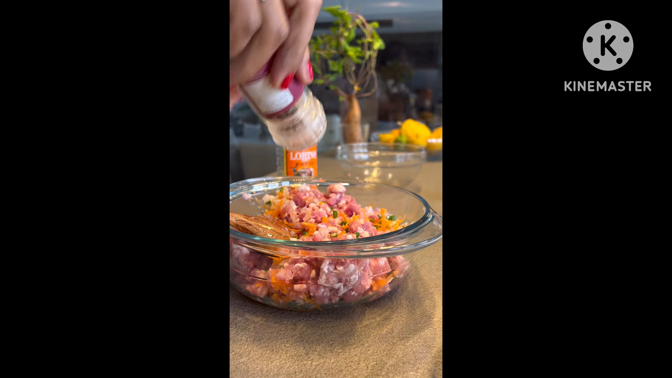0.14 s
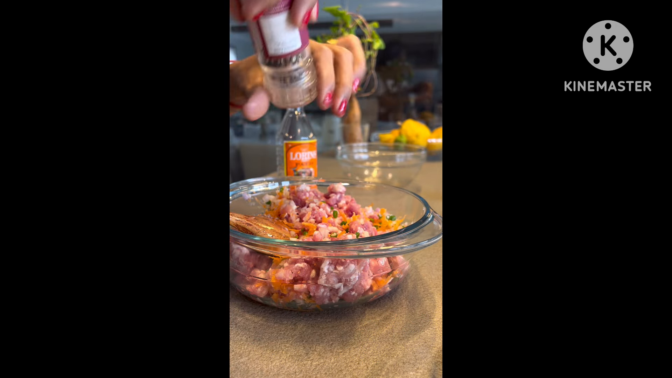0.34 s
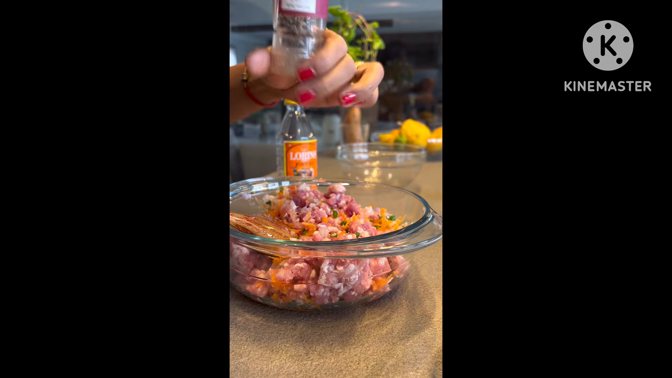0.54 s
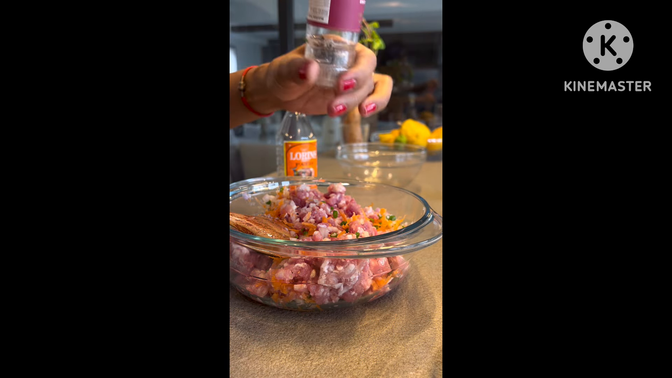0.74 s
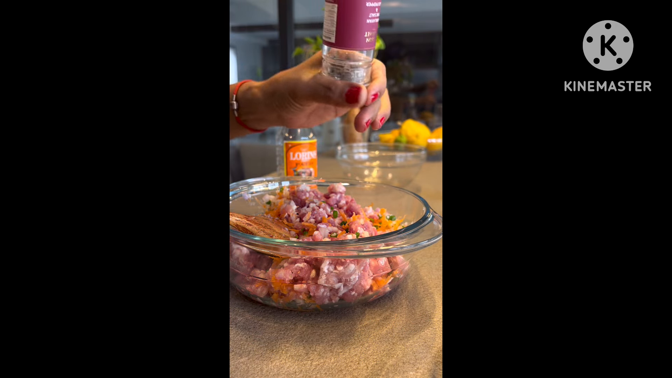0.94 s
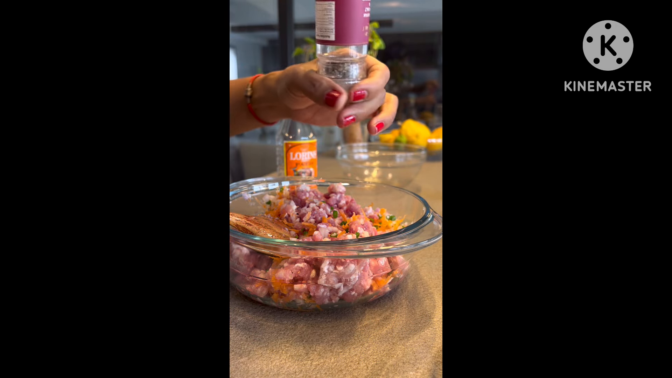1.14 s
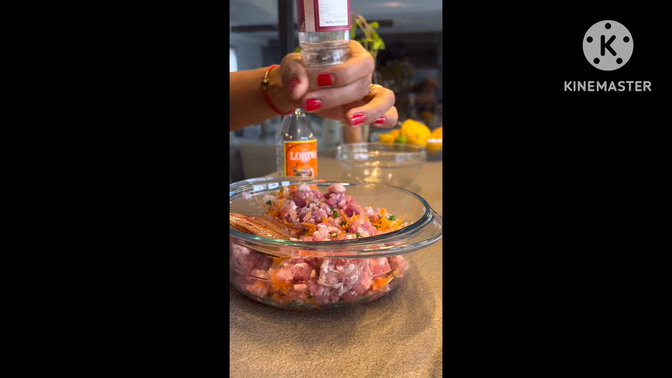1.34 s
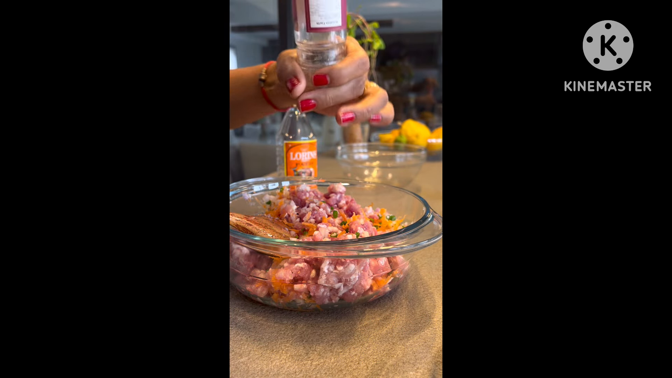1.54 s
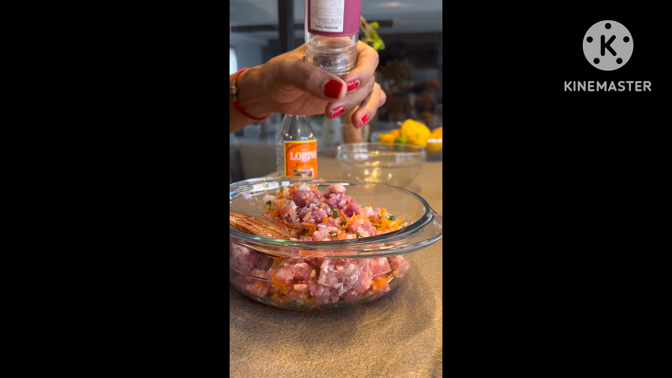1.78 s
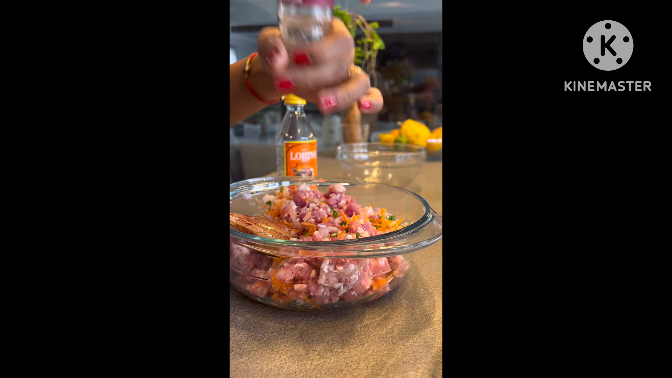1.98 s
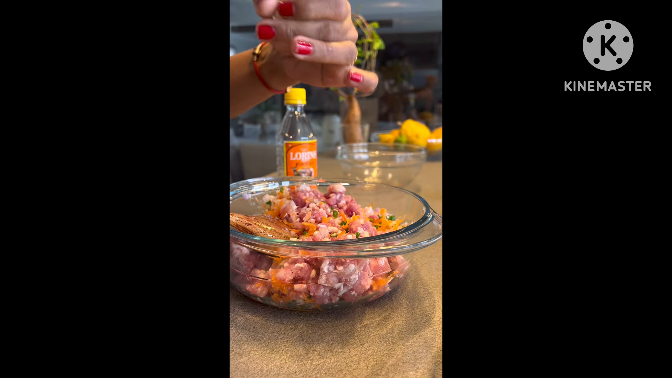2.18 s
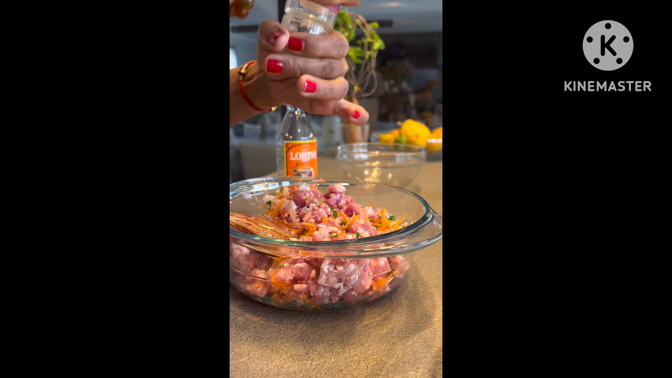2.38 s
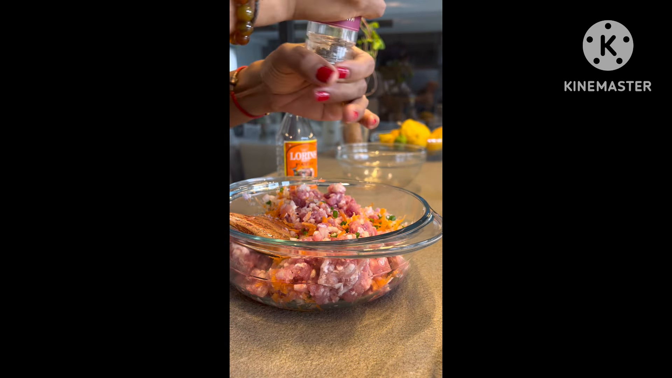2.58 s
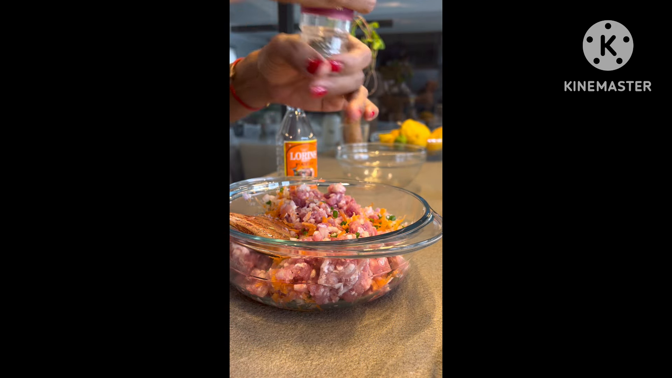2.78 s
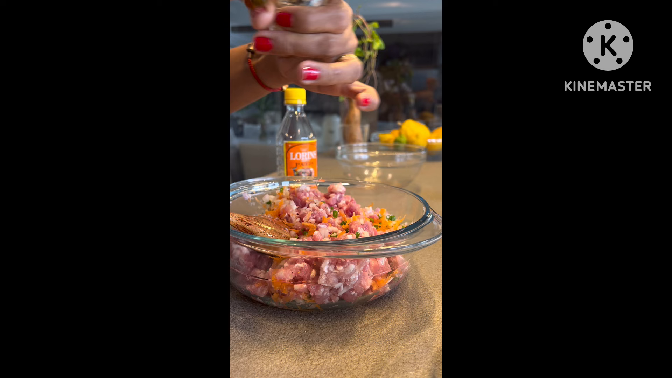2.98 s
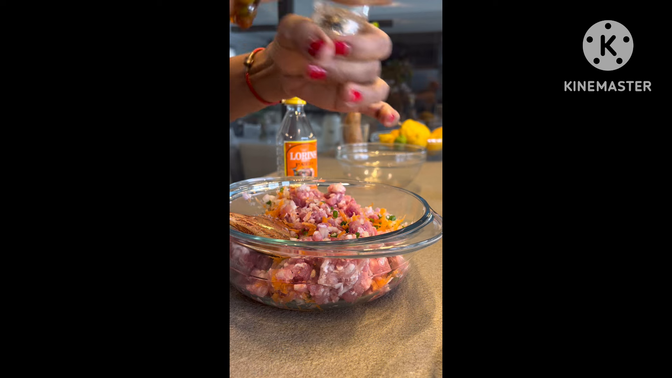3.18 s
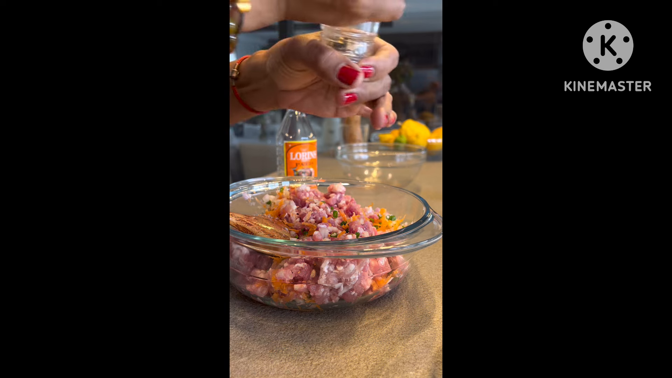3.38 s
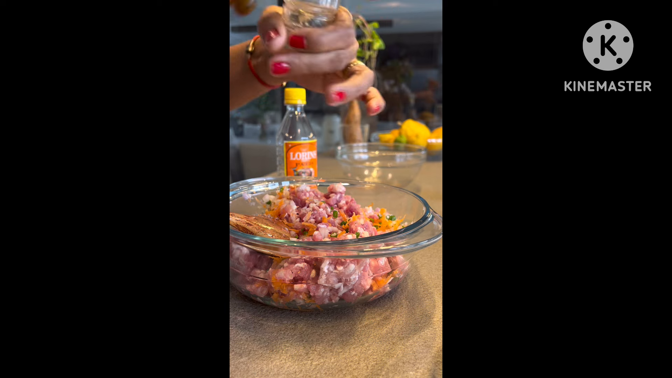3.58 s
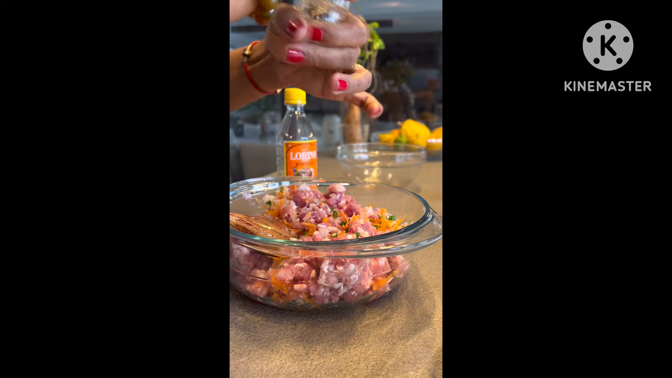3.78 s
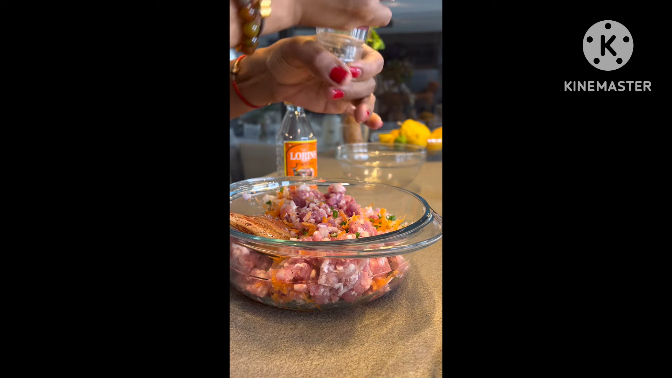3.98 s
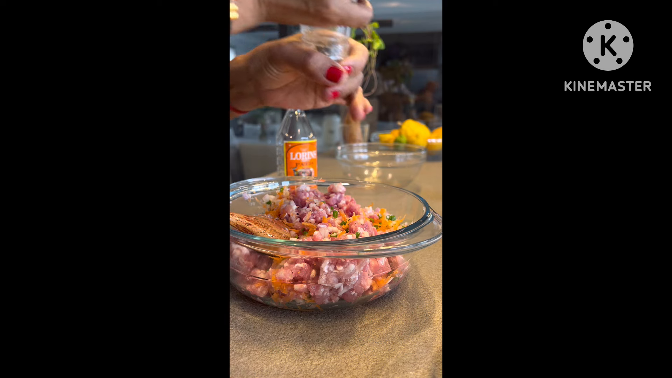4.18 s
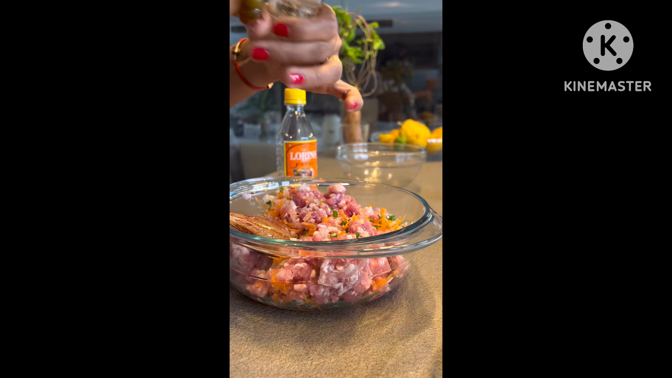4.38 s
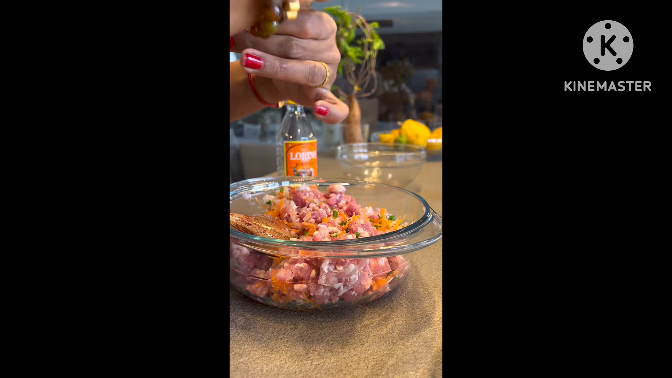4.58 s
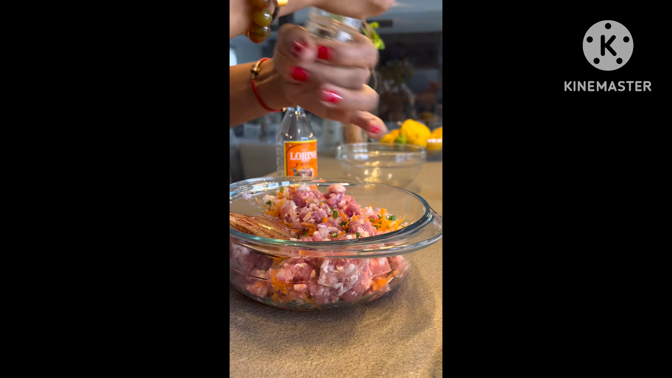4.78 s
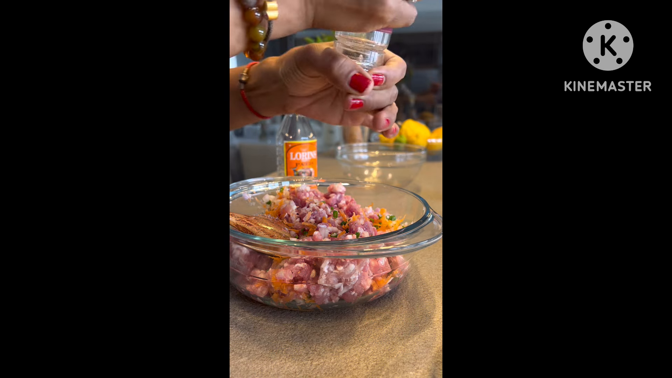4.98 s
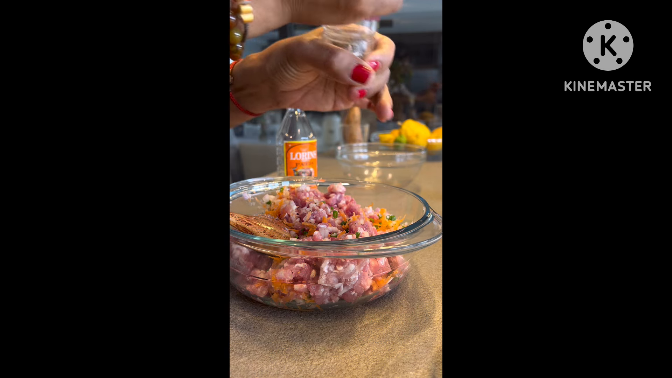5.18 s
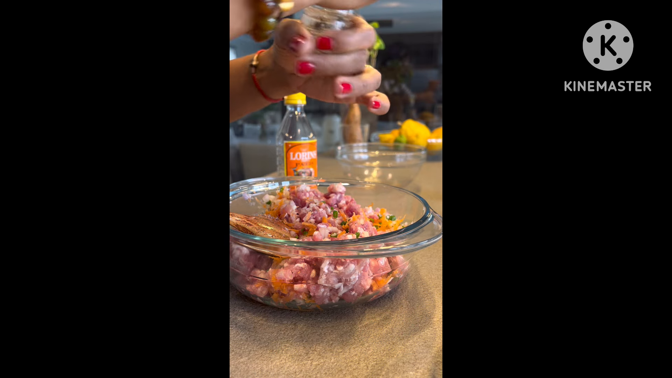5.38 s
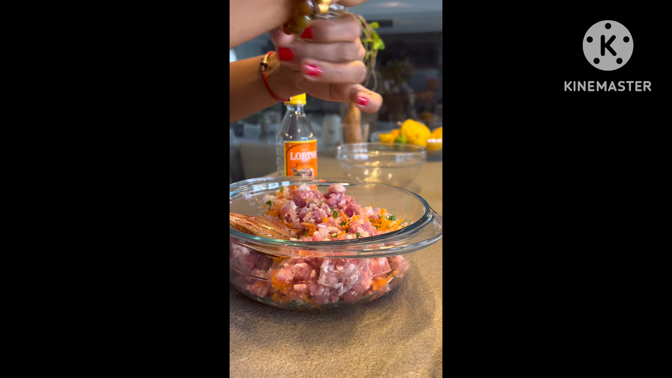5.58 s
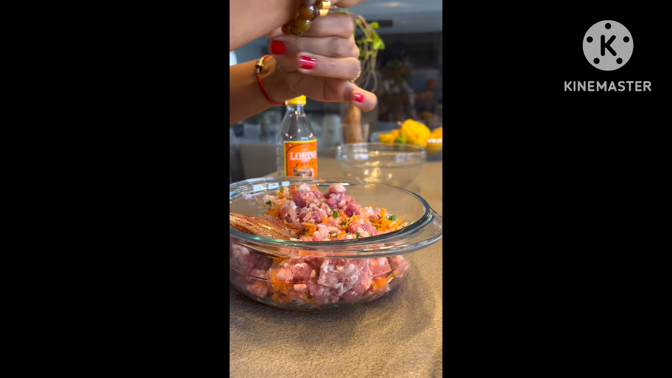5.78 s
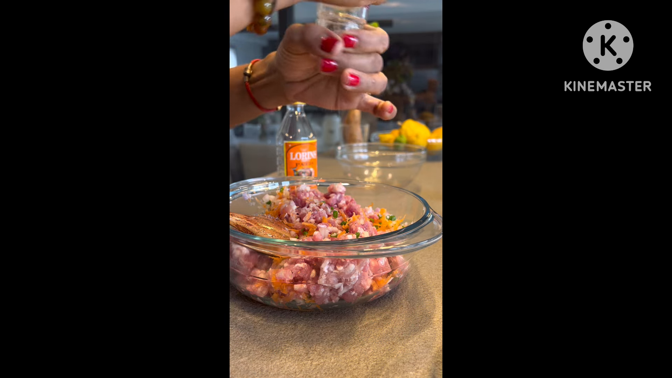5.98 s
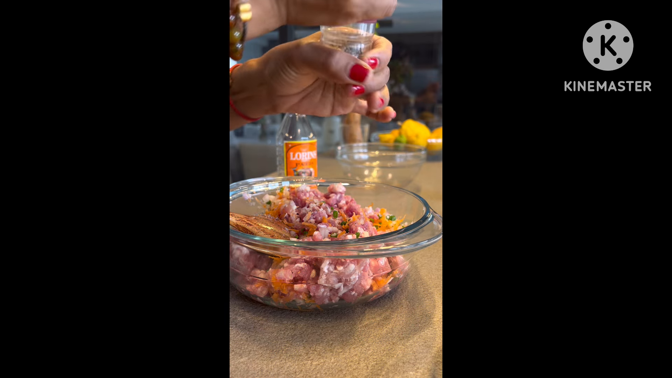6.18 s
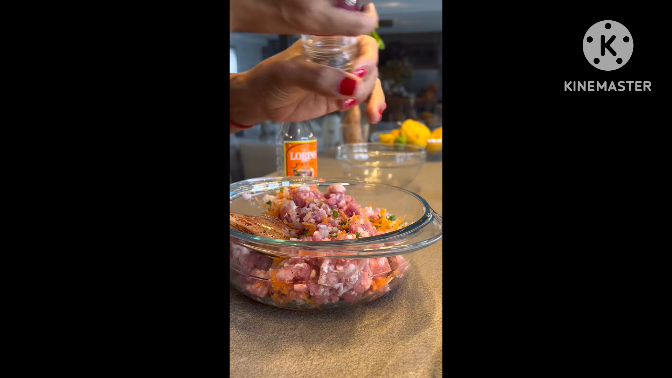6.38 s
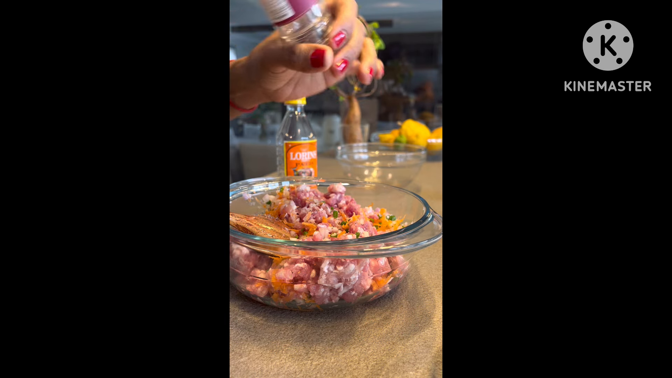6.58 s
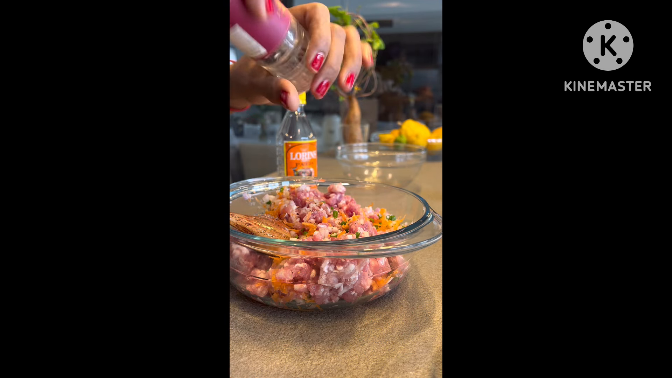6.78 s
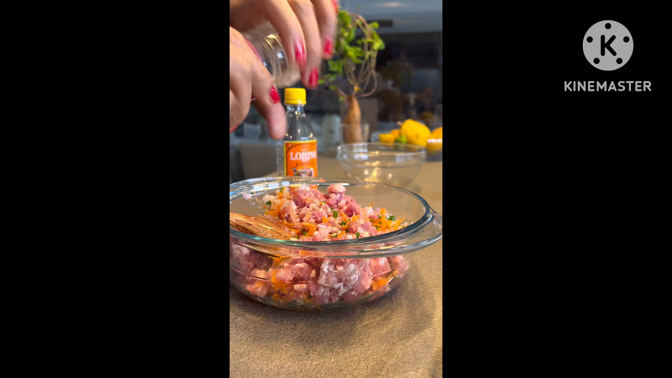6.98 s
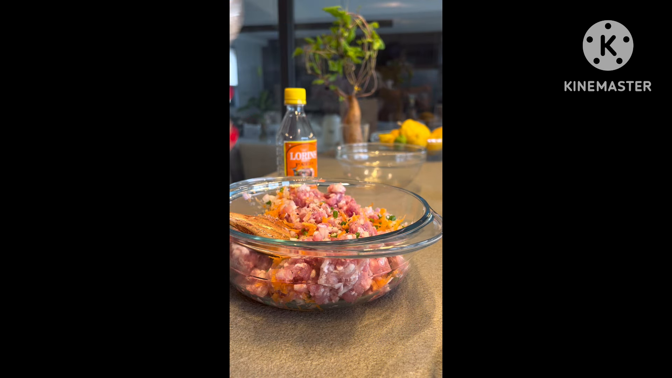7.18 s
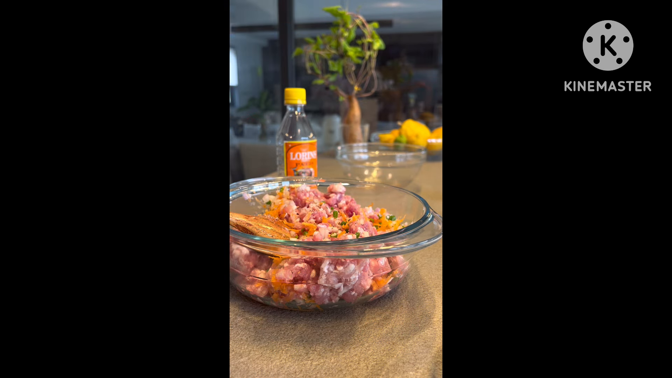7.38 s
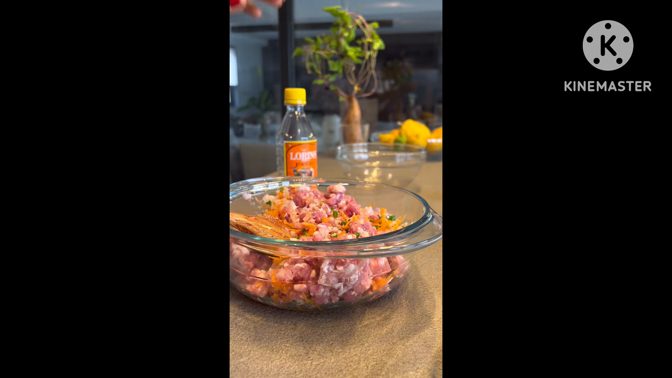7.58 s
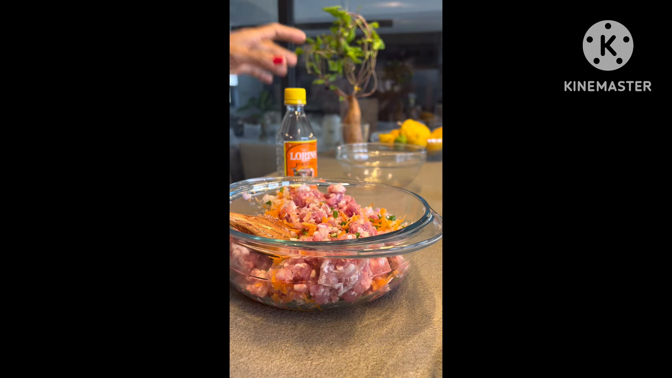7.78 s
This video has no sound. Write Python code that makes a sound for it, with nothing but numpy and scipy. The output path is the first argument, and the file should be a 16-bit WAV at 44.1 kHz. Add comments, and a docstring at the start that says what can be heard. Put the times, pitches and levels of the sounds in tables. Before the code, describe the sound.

Close, in a hard, echoing kitchen, loose crystals clink brightly in a glass jar with a burst of grit. A hand-twisted grinder then cracks coarse salt in uneven strokes with short gaps, growing denser midway. After the last crunches it goes nearly quiet, grains slide softly along the glass, and the jar lands with a padded knock. A faint low compressor hum and room air lie beneath.

```python
"""In a hard kitchen, a hand-twisted salt mill works over a bowl, heard from close by. Crystals clink in the glass
jar as it tips, then crack between the burrs (the grinding teeth); each crack is a noise burst plus short rings.
Grit crackles as many tiny bursts, grains slide along the glass, nails tick on the jar, and it is set down with
a knock. Dense noise echoes make the room ring; wavering low tones are a compressor's hum, soft noise is the air."""
import sys
import numpy as np
from scipy import signal
from scipy.fft import rfft, irfft, next_fast_len
from scipy.io import wavfile

SR = 44100
rng = np.random.default_rng(int(sys.argv[2]) if len(sys.argv) > 2 else 0)


def unload_audio(sound):
    """Save the sound as a 16-bit wav file, at the path given as the first command line argument."""
    columns = np.transpose(np.atleast_2d(sound))
    # keep every value between -1 and 1, then stretch to whole-number steps
    steps = np.round(np.clip(columns, -1, 1) * 32767)
    wavfile.write(sys.argv[1], SR, steps.astype(np.int16))


N = 345744  # length in samples
SIZE = next_fast_len(N + SR)  # filter length in samples, with room for a one-second echo tail
HZ = np.arange(SIZE // 2 + 1) * SR / SIZE  # the frequencies of the filters
TOP_HZ = 16900  # nothing much is heard above this

# Levels in the tables are relative, unless a comment says otherwise.
# background hum of the compressor: f/Hz, level/dB (rms of the steady part, before the waver)
HUM_TONES = [(49.3, -67.5), (98.6, -68), (147.9, -72)]
# air of the room: f/Hz, level/dB per Hz
AIR_SPECTRUM = [(33, -120), (50, -87), (150, -89), (450, -102), (1000, -95), (2500, -102), (6000, -110),
                (16000, -118)]
# sounds from all around: f/Hz, likeness of left and right/0-1
LEFT_RIGHT_LIKENESS = [(100, 0.98), (700, 0.59), (4000, 0.3), (6000, 0.91), (16000, 1)]
# fine grit crushed or shaken in each stroke: full from t/s, held t/s, level/dB
GRIT_STROKES = [(0, 0.046, -20.5), (0.421, 0.11, -40), (1.2, 0.084, -24.5), (4.252, 0.045, -38.5),
                (5.251, 0.023, -26), (5.4, 0.29, -36.5), (5.818, 0.4, -29), (6.708, 0.0095, -34.5)]
# how fast the grit swells and dies, and its level with the mill at rest
BUILD_DB_PER_S, EASE_DB_PER_S, STILL_DB = 218.5, 314, -74.5
# tone of the snaps and the grit: f/Hz, level/dB
SNAP_COLOUR = [(2500, -33), (4200, -6.5), (7500, -0.5), (9000, -2), (12000, -7), (15500, -8), (16800, -44)]
# rings heard with each crunch of the burrs, the lowest a woody knock that grows with them: f/Hz, level/dB, time
# to fall 60 dB t/s
BURR_MODES = [(950, -7, .01), (1750, 2, .007), (2300, 2, .007), (2800, -1, .005), (3500, -1, .012),
              (4950, -7, .005)]
# echoes in octave bands: centre f/Hz, level/dB, time to fall 60 dB t/s
ROOM_BANDS = [(254.4, 0, 0.46), (478.8, -4.5, 0.38), (964.6, -6.5, 0.5), (2035, -5, 0.36),
              (4270, -6.5, 0.46), (8330, -10.5, 0.5), (15800, -11, 0.45)]
# crystals hitting the glass: t/s, level/dB
CLINK_EVENTS = [(0.011, -9), (0.018, -14), (0.0423, -10.5), (0.064, -20.5)]
# rings of the glass: f/Hz, level/dB, time to fall 60 dB t/s
GLASS_MODES = [(3100, 19, 0.0039), (3550, 11.5, 0.0024), (6620, 11.5, 0.016), (8870, -8, 0.0049),
               (4960, 6, 0.03)]
# crystals that break or shift, and last a small tick after the jar is set down:
# t/s, snap level/dB, burr ring minus snap level/dB
CRACK_EVENTS = [(0.094, -20.5, -10), (0.1746, -20, -13.5), (0.2094, -27.5, -12.5), (0.4187, -36.5, -2.5),
                (0.466, -35.5, -33.5), (0.5706, -34, -2), (0.6746, -10, -11), (0.727, -25.5, -5),
                (0.7953, -27.5, -6.5), (0.8354, -10, 1), (0.9051, -1.5, -9), (0.959, -16.5, -9.5),
                (1.0647, -26.5, -6.5), (1.158, -25.5, -6.5), (1.192, -25, 0.5), (1.2217, -16.5, -6.5),
                (1.5168, -22.5, -6), (1.6476, -5, -5), (1.6665, -7.5, -6), (1.7371, -6, -12.5),
                (2.0733, -35.5, -9), (2.1342, -20, -17), (2.2447, -24, -8), (2.279, -27.5, -6),
                (2.326, -22, -3.5), (2.39, -28.5, -15.5), (2.4195, -5.5, -4.5), (2.537, -16, -2),
                (2.549, -23, -10), (2.571, -4, -10), (2.584, -22, -5), (2.6005, -9.5, -8), (2.614, -23, 7),
                (2.8575, -34.5, -12.5), (2.9861, -28.5, -13.5), (3.0665, -11, -10.5), (3.1336, -18, 1),
                (3.1495, -10.5, -14), (3.1723, -12.5, -13), (3.226, -29.5, 8.5), (3.2342, -15, -14),
                (3.238, -7.5, -10.5), (3.2478, -21.5, -8.5), (3.258, -18.5, 3.5), (3.2902, -15, -14),
                (3.3147, -21, -5.5), (3.543, -31, -11.5), (3.6664, -17.5, -13.5), (3.7821, -7.5, -8),
                (3.797, -22, 10), (3.8041, -7.5, -20.5), (3.8809, -4, -8), (3.9444, -12, -10.5),
                (3.9536, -12, 2), (3.973, -12, -5), (4.009, -13, -3), (4.0333, -15, -3),
                (4.0373, -10.5, -0.5), (4.201, -35, 0.5), (4.4094, -21, -8.5), (4.523, -24.5, -8),
                (4.6745, -16, -8.5), (4.7088, -17.5, -3.5), (4.722, -21, -5), (4.7442, -5.5, -9.5),
                (4.7682, -11, -2.5), (4.814, -20, -18), (4.833, -11.5, -2), (4.8443, -8.5, -16),
                (4.8683, -27.5, 3.5), (4.927, -22, 6.5), (4.9659, -17, -9.5), (4.9996, -10.5, -8),
                (5.005, -16.5, -5), (5.038, -15, -12), (5.1836, -38.5, 2), (5.21, -25, -5),
                (5.238, -27.5, 0), (5.264, -23.5, 2.5), (5.3274, -6.5, -11.5), (5.365, -18.5, -1.5),
                (5.5584, -5, -13.5), (5.5754, -4, -7.5), (5.8, -23, -7), (5.8737, -6.5, -6),
                (5.9133, -7, -9.5), (5.9481, -7.5, -9), (5.984, -22.5, 1), (6.041, -9, -10.5),
                (6.0642, -11.5, -5), (6.1085, -11, -7.5), (6.163, -24.5, 0), (6.173, -17, -31),
                (6.181, -24.5, -4), (6.1902, -7.5, -11.5), (6.2692, -25, -11), (6.2827, -18.5, -4),
                (6.7843, -30, -15), (7.7323, -35, -41)]
# dull ring of the jar: f/Hz, level/dB, time to fall 60 dB t/s
JAR_MODES = [(356, 0, 0.028)]
# small ticks of the jar against nails, rings and counter: t/s, level/dB, pitch f/Hz
TICK_EVENTS = [(0.381, -42, 1000), (0.449, -41, 1540), (6.7087, -44, 2270), (6.715, -41.5, 2300),
               (6.84, -48, 2000), (6.8708, -48, 1600), (6.957, -48, 1180), (7.59, -40, 2480)]
# bumps of the jar: t/s, level/dB
THUD_EVENTS = [(0.57, -38.5), (0.705, -37.5), (0.837, -28), (1.651, -27.5), (3.257, -34), (7.752, -44),
               (7.787, -41.5)]
# grains sliding back along the glass as the jar turns over: t/s, lowest level/dB of a grain
SLIDE_LEVELS = [(6.932, -61.5), (7.253, -47), (7.33, -49.5), (7.391, -77)]
# tone of the sliding grains: f/Hz, level/dB
SLIDE_TONE = [(4500, -31.5), (6200, -7.5), (7500, -16), (11500, -19.5), (13200, -11), (16000, -21)]
# jar set down on the counter: t/s, level/dB
KNOCK_EVENTS = [(7.588, -13.5)]
# rings of the counter: f/Hz, level/dB, time to fall 60 dB t/s
COUNTER_MODES = [(139, -12, 0.093), (320, -8, 0.04), (566, 4, 0.015), (812, 6, 0.014), (1190, 1.5, 0.011)]
# stereo spread over the whole sound: f/Hz, phase by which left leads/radians, left minus right level/dB
STEREO_SPREAD = [(774, 0.94, 2), (2220, -2.5, -1), (2840, 3, -7.5), (3530, 1.68, 1), (5190, 1.56, -2.5),
                 (6078, 3.5, 0.5), (15390, 16.5, -0.5)]


def undb(db):
    """Turn decibels into a plain multiplier."""
    return 10 ** (np.asarray(db) / 20)


def colour(x, points):
    """Shape the tone by (Hz, dB) points, joined by straight lines on a log frequency axis."""
    hz, db = np.transpose(points)
    gain = undb(np.interp(np.log(HZ + 1), np.log(hz), db))
    return irfft(rfft(x, SIZE) * gain, SIZE)[..., :N]


def fall(t60, count):
    """Fade that drops 60 dB in t60 seconds, and its time axis."""
    t = np.arange(count) / SR
    return np.exp(-np.log(1000) * t / t60), t


def strikes(times, gains, modes, push_s, scatter_db, detune):
    """Each blow rings the modes with its own balance; a longer push softens the attack."""
    hz, db, t60 = np.transpose(modes)[:, :, None]
    decay, t = fall(t60, count=int(t60.max() * SR))
    swell = 1 - np.exp(-1.5 * hz * t)  # low modes take longer to build up
    push = np.hanning(int(push_s * SR) + 3)
    chance = rng.standard_normal((len(times), 3, len(modes), 1))
    out = np.zeros(N + 2 * SR)
    for s, gain, (level_luck, pitch_luck, phase) in zip(times, gains, chance):
        wave = np.sin(2 * np.pi * (hz * (1 + detune * pitch_luck) * t + phase))
        modes_sound = undb(db + scatter_db * level_luck) * swell * decay * wave
        ring = np.convolve(modes_sound.sum(0), push)
        at = int(s * SR)
        out[at:at + len(ring)] += gain * ring / np.abs(ring).max()
    return out[:N]


def snaps(times, gains, t60):
    """Each snap is a burst of noise that swells for an instant and dies."""
    decay, t = fall(t60, count=512)
    swell = 1 - np.exp(-(t / 0.0007) ** 2)
    bursts = rng.standard_normal((len(times), len(t))) * decay * swell
    early_rms = np.sqrt((bursts[:, :64] ** 2).mean(axis=1))
    bursts *= (gains / early_rms)[:, None]
    starts = (np.asarray(times) * SR).astype(int)
    out = np.zeros(N + len(t))
    np.add.at(out, starts[:, None] + np.arange(len(t)), bursts)
    return out[:N]


def diffuse(count):
    """Left and right noise, mixed from one shared and two separate noises."""
    three = rfft(rng.standard_normal((3, count)))
    hz, alike = np.transpose(LEFT_RIGHT_LIKENESS)
    bins_hz = np.arange(three.shape[1]) * SR / count
    alike = np.clip(np.interp(np.log(bins_hz + 1), np.log(hz), alike), 0, 1)
    return irfft(np.sqrt(alike) * three[0] + np.sqrt(1 - alike) * three[1:], count)


def kitchen():
    """A compressor's hum that wavers a little, and the air of the room."""
    t = np.arange(N) / SR
    knots = np.arange(0, t[-1] + 1, .08)  # a new random waver every 0.08 s
    hum = 0
    for hz, db in HUM_TONES:
        # the complex waver changes both loudness and phase
        waver = np.interp(t, knots, rng.standard_normal((len(knots), 2)) @ [1, 1j])
        tone = np.real((1 + .6 * waver) * np.exp(2j * np.pi * hz * t))
        hum = hum + np.sqrt(2) * undb(db) * tone
    air = np.sqrt(SR / 2) * colour(diffuse(count=N), AIR_SPECTRUM)
    return hum + air


def effort_db(t):
    """Each stroke builds up, holds and eases off; the strongest one at the moment counts."""
    s, held, db = np.transpose(GRIT_STROKES)[:, :, None]
    build = BUILD_DB_PER_S * np.clip(s - t, 0, None)
    ease = EASE_DB_PER_S * np.clip(t - s - held, 0, None)
    return np.maximum((db - build - ease).max(axis=0), STILL_DB)


def crunch(times, gains, scatter_db):
    """The burrs answer a snap with short rings and a dull burst of crushing noise that blurs them."""
    crush_band = signal.butter(2, [1000, 4500], "band", fs=SR, output="sos")
    crush = signal.sosfilt(crush_band, snaps(times, gains, 0.011))
    return strikes(times, gains, BURR_MODES, .0001, scatter_db, detune=0.034) + undb(-5.5) * crush


def grit():
    """Many tiny fractures at random moments, few of them large, over a sliding rustle."""
    times = rng.uniform(0, N / SR, 2400)
    boost_db = 4.9 * np.minimum(rng.exponential(size=len(times)), 3)
    sizes = undb(effort_db(times) + boost_db - 14.0)
    rustle = undb(effort_db(np.arange(N) / SR) - 21) * rng.standard_normal(N)
    crackle = colour(snaps(times, sizes, 0.0051) + rustle, SNAP_COLOUR)
    # every third grain also sounds the burrs
    return crackle + undb(1.5) * crunch(times[::3], sizes[::3], scatter_db=8.0)


def echoes():
    """Dense echoes that build up over a few ms, each octave dying at its own rate."""
    noise, out = diffuse(count=SR), 0
    for hz, db, t60 in ROOM_BANDS:
        decay, t = fall(t60, count=SR)
        edges = [hz / np.sqrt(2), min(hz * np.sqrt(2), SR / 2 - 100)]
        octave = signal.butter(2, edges, "band", fs=SR, output="sos")
        # each octave starts at a different place in the noise
        band = signal.sosfilt(octave, np.roll(noise, int(hz), axis=1))
        build = 1 - np.exp(-(t / 0.0025) ** 2)
        out = out + undb(db) * band * decay * build / np.sqrt((decay ** 2).sum())
    return out


def room(x, count=4):
    """The hands keep moving the mill, so the sound glides around a circle of echo patterns."""
    place = np.arange(N) / SR / .11 % count  # on to the next pattern every 0.11 s
    out = 0
    for k in range(count):
        distance = np.abs((place - k + count / 2) % count - count / 2)
        share = np.sqrt(np.clip(1 - distance, 0, 1))
        out = out + rfft(x * share, SIZE) * rfft(echoes(), SIZE)
    return irfft(out, SIZE)[:, :N]


def clinks():
    """Loose crystals tumble against the glass; each blow is trailed by smaller ones."""
    s, db = np.transpose(CLINK_EVENTS)
    after = rng.exponential(size=(len(s), 2, 3))
    times = np.append(s, s[:, None] + 0.0033 * after[:, 0])
    sizes = undb(np.append(db, db[:, None] - 6 * after[:, 1] - 4.5))
    return strikes(times, sizes, GLASS_MODES, .00005, scatter_db=6.0, detune=0.015)


def cracks():
    """Every crack or tick gives a snap, the crunch of the burrs and the thud of the jar."""
    s, snap_db, burr_db = np.transpose(CRACK_EVENTS)
    # the jar shakes with the burrs, but grows less than they do, so the biggest cracks stay bright
    jar_gains = undb(0.53 * (snap_db + burr_db) - 33.0)
    jar = strikes(s, jar_gains, JAR_MODES, .0004, scatter_db=5.5, detune=0.14)
    # two weaker bursts, scattered a few ms around each crack, roughen and soften its attack
    scatter = rng.standard_normal((len(s), 2, 2))
    s = np.append(s, s[:, None] + 0.003 * scatter[:, 0])
    snap_db = np.append(snap_db, snap_db[:, None] - 18.0 + 3 * scatter[:, 1])
    burr_db = np.append(burr_db, np.repeat(burr_db, 2))
    snap = colour(snaps(s, undb(snap_db + 1.0), 0.0076), SNAP_COLOUR)
    return snap + crunch(s, undb(snap_db + burr_db), scatter_db=3.0) + jar


def ticks():
    """Each tick rings a short pair of modes, one at about its own pitch and a weaker one above."""
    out = 0
    for s, db, hz in TICK_EVENTS:
        pair = [(hz, 0, .012), (1.4 * hz, -6, .006)]
        out = out + strikes([s], [undb(db)], pair, .0001, scatter_db=0.0, detune=0.01)
    return out


def thuds():
    """Dull bumps ring the jar, softened by a longer push."""
    s, db = np.transpose(THUD_EVENTS)
    return strikes(s, undb(db), JAR_MODES, 0.0017, scatter_db=1.0, detune=0.05)


def slide():
    """Grains sliding along the glass make a dense patter of tiny noise bursts."""
    s, db = np.transpose(SLIDE_LEVELS)
    times = rng.uniform(s[0], s[-1], 300)
    boost_db = 6.2 * np.minimum(rng.exponential(size=len(times)), 3)
    sizes = undb(np.interp(times, s, db) + boost_db)
    return colour(snaps(times, sizes, 0.022), SLIDE_TONE)


def knocks():
    """The jar meets the counter with a soft, padded blow that rings the counter."""
    s, db = np.transpose(KNOCK_EVENTS)
    return strikes(s, undb(db), COUNTER_MODES, 0.001, scatter_db=1.0, detune=0.01)


def scene():
    """The mill close by, its echoes and the kitchen."""
    near = grit() + clinks() + cracks() + ticks() + thuds() + slide() + knocks()
    return near + room(near) + kitchen()


def record(dry):
    """Left and right differ in phase and level at each frequency; peaks are rounded, the top is cut."""
    hz, lead, balance_db = np.transpose([np.zeros(3), *STEREO_SPREAD])  # alike in the deepest bass
    side = np.array([[.5], [-.5]])  # half of each difference goes to the left, half to the right
    phase = np.exp(1j * np.interp(HZ, hz, lead) * side)
    level = undb(np.interp(HZ, hz, balance_db) * side)
    pair = irfft(rfft(dry, SIZE) * phase * level, SIZE)[:, :N]
    top_cut = signal.ellip(10, .2, 90, TOP_HZ, fs=SR, output="sos")
    return signal.sosfilt(top_cut, np.tanh(pair))


dry = scene()
out = record(dry)
unload_audio(out)
```